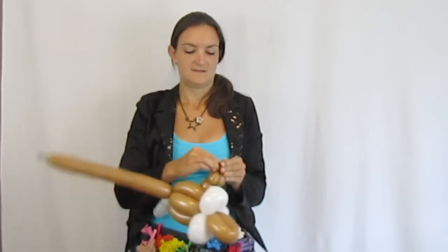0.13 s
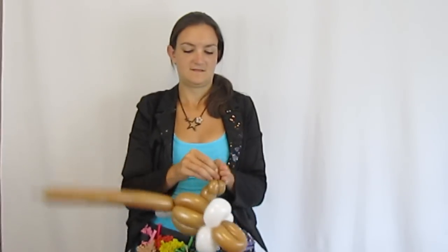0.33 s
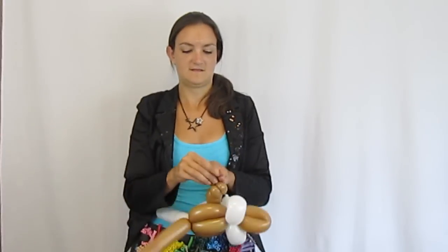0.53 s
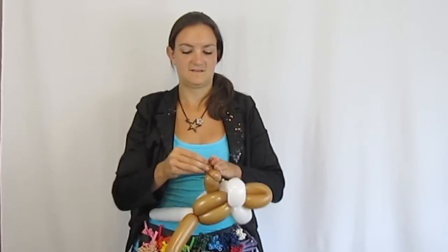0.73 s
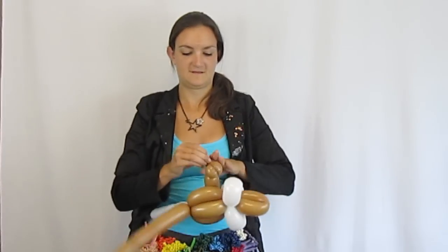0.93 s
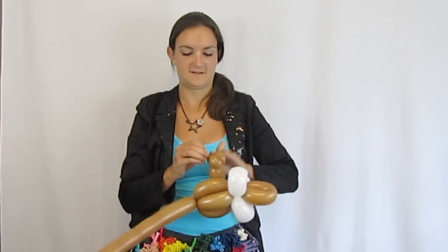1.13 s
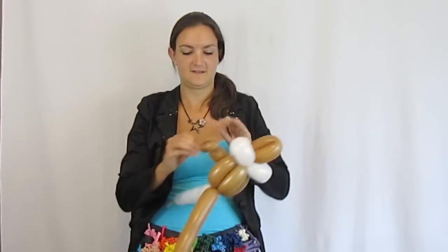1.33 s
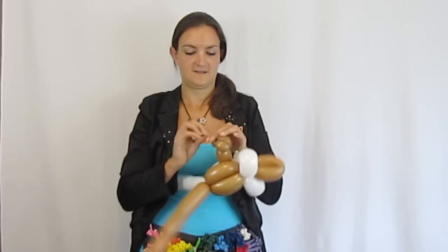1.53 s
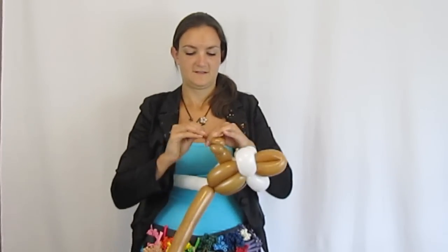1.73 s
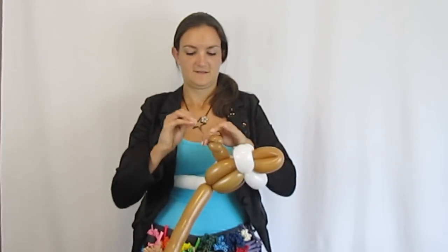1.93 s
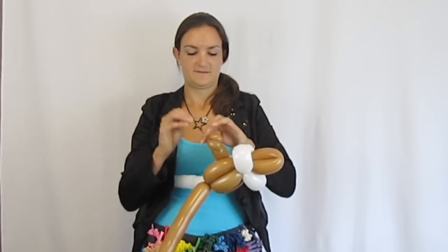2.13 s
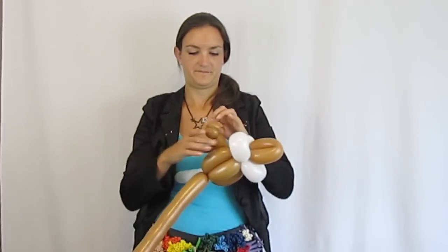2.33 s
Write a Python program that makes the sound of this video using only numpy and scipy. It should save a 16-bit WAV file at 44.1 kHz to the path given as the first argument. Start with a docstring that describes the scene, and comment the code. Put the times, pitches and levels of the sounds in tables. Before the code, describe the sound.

Scratchy, squeaky balloon rubbing as hands twist it, building to two loud snapping jerks, then quieter.

```python
"""Scratchy rubbing is heard first: latex modelling balloons twisted by hand in a bare, lively room.
Rubber sticks and slips in uneven strokes that ring the taut skin and the hollow body filled with air.
Twice the twist jerks free with a loud snap, the first with a low thump; fingers flick small ticks.
Brief groans arise where the slips become regular, and noise and mains hum lie faintly behind."""
import sys
import numpy as np
from scipy import signal
from scipy.fft import rfft, irfft
from scipy.io import wavfile
from scipy.ndimage import uniform_filter1d

SR = 44100
rng = np.random.default_rng(int(sys.argv[2]) if len(sys.argv) > 2 else 0)


def to_wav(sig):
    """Store sig (one row per channel, or 1-D mono) as 16-bit WAV at the path in sys.argv[1].

    Samples outside -1..1 are clipped; the rate is SR.
    """
    pcm = np.clip(np.atleast_2d(sig), -1, 1) * 32767
    pcm = np.round(pcm).astype(np.int16)
    wavfile.write(sys.argv[1], SR, pcm.T)  # frames by channels


N = 110250  # samples, 2.5 s

# Rubbing strokes. Each row: start in seconds, rise in seconds, fall in seconds, slips per second
# (from the median gap), skin ring in dB, ring centre in Hz, hollow body in dB, body centre in Hz,
# fizz in dB, fizz tilt in dB per octave.
STROKES = [ (-.04, 0.014, 0.213, 720, -34.5, 2234, -40, 302, -40, 1),
           (.07, 0.0192, 0.167, 463.6, -36, 1160, -42.5, 447, -39.5, -5.5),
           (.16, 0.017, 0.0733, 635, -32.5, 2480, -42, 834, -38, 2.5),
           (.218, 0.0122, 0.1098, 940, -28.5, 2465, -35, 280, -31.5, 1),
           (.32, 0.0427, 0.059, 660, -34.5, 2460, -39.5, 440, -37.5, 1.5),
           (.411, 0.0062, 0.1654, 1290, -36, 2810, -43.5, 404, -32, 8),
           (.45, 0.0203, 0.08, 672, -31, 2710, -42, 600, -36.5, -1.5),
           (.525, 0.0255, 0.228, 771, -31.5, 2734, -39, 665, -38, -1.5),
           (.635, 0.0657, 0.093, 500, -23.5, 2507, -34.5, 600, -31.5, 1.5),
           (.695, 0.0287, 0.147, 248, -26.5, 2500, -34, 695, -33, 3.5),
           (.79, 0.073, 0.0483, 400, -23, 2234, -33, 425, -30.5, -3),
           (.852, 0.0195, 0.0253, 230, -17, 1975, -35, 676, -30, -2),
           (0.921, 0.0138, 0.068, 400, -27.5, 1880, -45.5, 434, -35, -3),
           (.982, 0.0028, 0.11, 450, -29, 1704, -46, 600, -37, 6),
           (1.033, .002, 0.0076, 1200, -17.5, 2150, -35.5, 600, -24.5, 6),
           (1.0413, 0.00187, 0.00955, 1200, -1.5, 1728, -26.5, 295, -21, 13),
           (1.052, 0.0221, 0.0444, 300, -14.5, 2360, -38.5, 600, -29, -9),
           (1.09, 0.013, 0.1275, 310, -17.5, 1715, -35, 600, -26, 1),
           (1.204, 0.00225, 0.0727, 804, -11.5, 1100, -21.5, 623, -17, -2.5),
           (1.222, 0.0055, 0.0613, 260, -11.5, 1714, -25.5, 840, -30, 9),
           (1.473, 0.0038, 0.18, 695, -33.5, 2700, -35, 324, -39, -4),
           (1.51, 0.0292, 0.154, 700, -31, 1654, -37.5, 896, -40, -2),
           (1.726, 0.0031, 0.148, 842, -43, 2160, -44, 600, -51.5, -1.5),
           (1.84, 0.0263, 0.21, 760, -36.5, 2090, -45, 600, -43, -3),
           (2.02, 0.00537, 0.0856, 580, -28.5, 1715, -46, 694, -36.5, -4),
           (2.055, 0.0337, 0.078, 463, -27.5, 1944, -36, 855, -33.5, 1.5),
           (2.14, 0.0434, 0.073, 400, -41.5, 1750, -40.5, 570, -61, -2),
           (2.251, 0.051, 0.123, 580, -54.5, 1520, -46.5, 264, -66, 6.5),
           (2.41, 0.044, 0.054, 682, -29.5, 1520, -36, 724, -40.5, -3),
           (2.462, 0.0032, 0.0504, 286.5, -24.5, 1430, -26.5, 333, -37, -7.5)]
# Sudden single slips and finger ticks. Each row: time in seconds, skin ring in dB, ring centre in Hz,
# hollow body in dB, crack in dB, crack tilt in dB per octave.
RELEASES = [ (0.0212, -31, 2520, -43.5, -23, 5), (0.0554, -31, 2070, -39, -11, 6),
            (.1225, -26.5, 2400, -30, -24, 8.5), (0.7421, -4, 2540, -30, -25.5, -13.5),
            (.8432, -9.5, 2300, -18.5, -16, 2), (0.8686, -2.5, 2016, -36, -4.5, -7),
            (.8922, -13, 2100, -23, -16.5, -6), (0.9855, -8.5, 1914, -25.5, -6.5, -5.5),
            (1.0401, 10, 1872, -19, -6.5, -1), (1.052, 4, 1836, -22.5, 0.5, -18),
            (1.0701, -7.5, 1900, -17, 1.5, -13.5), (1.2024, 17.5, 2042, -11.5, 7, 0.5),
            (1.2051, 10, 1720, -3, -12, -15.5), (1.2895, -13.5, 1890, -26, -29.5, -1.5),
            (1.727, -32.5, 2174, -35.5, -22, 2.5), (2.0325, -32.5, 1960, -22.5, -12, -3),
            (2.063, -15, 1840, -44, -19.5, 10.5), (2.1998, -24.5, 2150, -37.5, -1, 16.5)]
# Regular stick-slip. Each row: start in seconds, length in seconds, first pitch in Hz,
# last pitch in Hz, level in dB before the swell.
GROAN_NOTES = [(.705, 0.072, 757.6, 742.7, -41), (.745, 0.0533, 528.1, 445, -34.5),
               (.805, 0.0361, 396.6, 443.6, -34.5), (2.086, 0.0542, 422.4, 516.2, -28),
               (2.13, 0.0682, 508.3, 439.1, -37.5)]
# Spectra of the taut skin, the hollow body, the rubbing fizz and the crack of a release.
# Each row: frequency in Hz, relative density in dB per Hz.
SKIN_SPECTRUM = [(50, -68.5), (200, -39), (700, -18), (1150, -2), (1800, -1), (2400, -1), (2850, 0.5),
                 (3250, -3.5), (3900, -15), (6000, -18.5), (12000, -45)]
BODY_SPECTRUM = [(30, -29.5), (130, -10.5), (260, -5.5), (420, 1), (750, -1.5), (1050, -5), (1800, -9),
                 (5000, -79)]
FIZZ_SPECTRUM = [(500, -63.5), (2500, -21), (4100, 0), (5000, 5), (6500, 2), (8500, -4), (11000, -13),
                 (14000, -23), (16000, -58.5)]
CRACK_SPECTRUM = [(400, -40.5), (2500, 0), (4000, -4.5), (5800, 6), (8000, 0.5), (10500, -6.5),
                  (13500, -17.5), (14800, -31), (16000, -44.5)]
# Reverberation of the room. Each row: frequency in Hz, time to decay by 60 dB in seconds.
DECAY_TIMES = [(100, 0.42), (500, 0.541), (1000, 0.6326), (2000, 0.54), (3000, 0.434), (4200, 0.391),
               (6000, 0.454), (10000, 0.341), (15000, 0.2076)]
# Reflections from near walls. Each row: delay in seconds, level in dB re the direct sound.
NEAR_ECHOES = [(.0036, -6.5), (.0082, -2), (.0108, -29), (.0165, -12.5), (.0195, -7.5)]
# Likeness of the two channels. Each row: frequency in Hz, likeness from 0 to 1.
COHERENCE = [(50, 1), (130, 0), (350, 0.436), (700, 0.8956), (2500, 0.9045), (4500, 0.711), (7000, 0.65),
             (11000, 0), (15000, 0)]
# Spectrum of the room noise. Each row: frequency in Hz, relative density in dB per Hz.
NOISE_SPECTRUM = [(20, -37), (50, -21.5), (100, -12.5), (170, -13), (300, -9), (700, -17), (1500, -15.5),
                  (4000, -24.5), (7000, -24), (11000, -36.5), (15000, -51)]

FADE_DB, SWELL_POWER = -26.5, 0.52  # change over a stroke's fall; force rises as this power of time
GAP_JITTER, SLIP_SPREAD_DB = .5, 5.5  # spread of the log gap between slips; spread of their strength
FIZZ_PER_S, FIZZ_SPREAD_DB = 2500, 2  # fine grains per second, from the median gap; their spread
# Broad spectral peaks in dB and octaves: skin in a stroke, hollow body, skin in a snap
RING_DB, RING_OCTAVES = 8, 0.541
BODY_RING_DB, BODY_OCTAVES = 5.5, 0.375
SNAP_RING_DB, SNAP_OCTAVES = 7.5, 0.248
CRACK_S, TEAR_DB, KNOCK_HZ = .0011, -3, 600  # tearing decay; its energy re the click; body centre
GROAN_WOBBLE, GROAN_SLOPE_DB = 0.0581, -16  # rms pitch deviation as a fraction; dB per octave of overtones
THUMP_AT_S, THUMP_PEAK_S, THUMP_DB = 1.0402, 0.0004, -33  # start, time to the peak, peak level
TAIL_CYCLES_PER_S = 7  # rounds through the room responses
DIRECT_DB, TAIL_DB = -8, -3.5
NOISE_DB, HUM_HZ, HUM_DB = -42.5, 117.3, -52.5  # rms levels
LIMIT_DB, RECOVER_DB_PER_S, ATTACK_S = -14.5, 6, 0.003215  # automatic gain control
LEFT_DB, CEILING_DB, EDGE_HZ = 0.32, -2.5, 16200  # lean to the left, overload level, band limit


def amp(db):
    """The decibel is logarithmic: 20 dB is a tenfold amplitude."""
    return 10 ** (np.asarray(db) / 20)


def evened(x):
    """Normalization: equal mean power is reached by scaling to rms 1."""
    return x / np.sqrt(np.mean(x ** 2) + 1e-20)


def read(points, hz):
    """Interpolation over log frequency, close to the ear's own pitch scale."""
    f, value = np.transpose(points)
    return np.interp(np.log(hz + 1), np.log(f + 1), value)


def add(mix, s, sound):
    """Superposition: pressures add; the sound enters at s seconds, cut at the ends of the mix."""
    at = round(s * SR)
    sound = sound[max(-at, 0):]
    part = mix[max(at, 0):][:len(sound)]
    part += sound[:len(part)]


def response(points, peak_hz=1000, peak_db=0, octaves=1, tilt_db=0, size=2048):
    """Minimum phase: log gain fixes the phase of a causal response, here of energy 1."""
    hz = np.fft.rfftfreq(size, 1 / SR)
    distance = np.log2((hz + 1) / peak_hz) / octaves
    db = read(points, hz) + peak_db * np.exp(-distance ** 2)
    db = db + tilt_db * np.log2(np.maximum(hz / 3000, 1))  # tilt acts above 3 kHz
    log_gain = np.log(amp(np.r_[db, db[-2:0:-1]]))
    spectrum = np.exp(np.conj(signal.hilbert(log_gain)))
    h = np.fft.ifft(spectrum).real[:size // 2]
    return h / np.linalg.norm(h)


def coherent_pair(z):
    """Coherence: a shared and an opposed part give two channels their likeness at each frequency."""
    a, b = rfft(z)
    same = np.clip(read(COHERENCE, np.fft.rfftfreq(z.shape[1], 1 / SR)), -1, 1)
    mid = a * np.sqrt((1 + same) / 2)
    side = b * np.sqrt((1 - same) / 2)
    return irfft(np.array([mid + side, mid - side]), z.shape[1])


def slips(rate, spread_db, size):
    """Stick-slip friction: stored strain is let go in jerks uneven in spacing and strength, rms 1."""
    gap, strength = rng.standard_normal((2, 2048))
    at = (np.cumsum(np.exp(GAP_JITTER * gap)) / rate * SR).astype(int)
    at -= at[0] // 2
    inside = at < size
    jerk = amp(spread_db * np.clip(strength, -2, 2))
    train = np.bincount(at[inside], jerk[inside], size)
    return evened(train - train.mean())


def rubbing():
    """Source and resonator: each stroke's slips drive skin and body, while finer grains fizz above."""
    out = np.zeros(N)
    for start, rise, fall, rate, skin_db, ring_hz, body_db, body_hz, fizz_db, tilt_db in STROKES:
        t = np.arange(0, rise + fall, 1 / SR)
        swell = np.minimum(t / rise, 1) ** SWELL_POWER
        force = swell * amp(FADE_DB * (np.maximum(t - rise, 0) / fall) ** 2)
        coarse = slips(rate, SLIP_SPREAD_DB, len(t))
        fine = slips(FIZZ_PER_S, FIZZ_SPREAD_DB, len(t))
        layers = [
            (skin_db, coarse, response(SKIN_SPECTRUM, ring_hz, RING_DB, RING_OCTAVES)),
            (body_db, coarse, response(BODY_SPECTRUM, body_hz, BODY_RING_DB, BODY_OCTAVES)),
            (fizz_db, fine + 0.87 * coarse, response(FIZZ_SPECTRUM, tilt_db=tilt_db))]
        for db, drive, h in layers:
            sound = signal.fftconvolve(force * drive, h)
            # each layer's energy follows that of the force
            add(out, start, amp(db) * sound * np.linalg.norm(force) / np.linalg.norm(sound))
    return out


def snapping():
    """Impulsive excitation: a click with a short burst of tearing noise; the skin rings, the body knocks."""
    out, t = np.zeros(N), np.arange(512) / SR
    for s, skin_db, ring_hz, body_db, crack_db, tilt_db in RELEASES:
        tear = rng.standard_normal(len(t)) * np.exp(-t / CRACK_S)
        click = t == 0
        burst = amp(TEAR_DB) * tear / np.linalg.norm(tear) + click
        crack = signal.fftconvolve(burst, response(CRACK_SPECTRUM, tilt_db=tilt_db))
        add(out, s, amp(crack_db) * 2 * crack / np.linalg.norm(crack))
        skin = response(SKIN_SPECTRUM, ring_hz, SNAP_RING_DB, SNAP_OCTAVES)
        body = response(BODY_SPECTRUM, KNOCK_HZ, BODY_RING_DB, BODY_OCTAVES)
        for db, h in (skin_db, skin), (body_db, body):
            add(out, s + CRACK_S / 2, -amp(db) * h / abs(h).max())  # dB at the peak
    return out


def groaning():
    """Periodic stick-slip: regular slips make a harmonic note, here gliding and wobbling."""
    out = np.zeros(N)
    for start, length, first_hz, last_hz, db in GROAN_NOTES:
        u = np.arange(0, 1, 1 / (length * SR))
        wobble = evened(uniform_filter1d(rng.standard_normal(N), size=150))[:len(u)]
        pitch_hz = (first_hz + (last_hz - first_hz) * u) * (1 + GROAN_WOBBLE * wobble)
        turns = np.cumsum(pitch_hz) / SR
        note = 0
        for k in range(1, 7):
            note = note + amp(GROAN_SLOPE_DB * np.log2(k)) * np.cos(2 * np.pi * k * turns)
        add(out, start, amp(db) * np.sin(np.pi * u) * evened(note))
    return out


def thump():
    """Low thump: one smooth pulse at the first loud snap, rising quickly and dying away."""
    out, u = np.zeros(N), np.arange(2048) / SR / THUMP_PEAK_S
    add(out, THUMP_AT_S, -amp(THUMP_DB) * u * np.exp(1 - u))
    return out


def room_response():
    """Reverberation: direct sound, near reflections, then a dense tail with its own decay in each band."""
    hz, t, z = signal.stft(rng.standard_normal((2, SR)), SR, nperseg=256)
    decay = amp(-60 * t / read(DECAY_TIMES, hz)[:, None])
    tail = signal.istft(z * decay, SR, nperseg=256)[1]
    onset = np.clip((np.arange(tail.shape[1]) / SR - .002) / 0.00391, 0, 1)  # begins after 2 ms
    tail = coherent_pair(tail * onset)
    h = amp(TAIL_DB) * tail / np.linalg.norm(tail[0])
    h[:, 0] += amp(DIRECT_DB)
    for k, (delay, db) in enumerate(NEAR_ECHOES):
        for channel in 0, 1:
            late = (k + channel) % 2  # one channel lags by a sample, in alternation
            h[channel, round(delay * SR) + late] += amp(DIRECT_DB + db)
    return h


def room(x, count=3):
    """Averaged reverberation: sound crossfades through random room responses in turn, for a smoother tail."""
    place, out = np.arange(N) / SR * TAIL_CYCLES_PER_S * count, 0
    for k in range(count):
        distance = abs((place - k + count / 2) % count - count / 2)
        share = np.clip(3 * (.5 - distance) + .5, 0, 1)
        sent = x * np.sin(np.pi / 2 * share)  # crossfade of constant power
        out = out + signal.fftconvolve(sent[None], room_response(), axes=1)[:, :N]
    return out


def background():
    """Stationary background: shaped Gaussian noise, partly alike in both channels, and a hum of one sine."""
    shape = amp(read(NOISE_SPECTRUM, np.fft.rfftfreq(N, 1 / SR)))
    air = irfft(rfft(rng.standard_normal((2, N))) * shape, N)
    phase = np.array([[0], [1.6]])  # radians, left and right
    hum = np.sin(2 * np.pi * HUM_HZ * np.arange(N) / SR + phase)
    return amp(NOISE_DB) * evened(coherent_pair(air)) + amp(HUM_DB) * evened(hum)


def scene():
    """Superposition: friction sounds pass through the room; the thump and background are added directly."""
    return room(rubbing() + snapping() + groaning()) + thump() + background()


def record(dry):
    """Compression: gain ducks at loud snaps and recovers slowly; then a lean, soft overload, a band limit."""
    keep = np.exp(-1 / (ATTACK_S * SR))
    power = signal.lfilter([1 - keep], [1, -keep], (dry ** 2).mean(0))
    level_db = 10 * np.log10(power + 1e-12)
    recovery = RECOVER_DB_PER_S * np.arange(N) / SR
    held_db = np.maximum.accumulate(level_db + recovery) - recovery  # peaks held, falling steadily
    over_db = np.maximum(held_db - LIMIT_DB, 0)
    gain = amp(-signal.lfilter([1 - keep], [1, -keep], over_db))
    ducked = dry * gain * amp([[LEFT_DB], [-LEFT_DB]])
    limited = amp(CEILING_DB) * np.tanh(ducked / amp(CEILING_DB))
    lowpass = signal.firwin(511, EDGE_HZ, window=("kaiser", 9), fs=SR)
    return signal.oaconvolve(limited, lowpass[None], "same")


dry = scene()
out = record(dry)
to_wav(out)
```